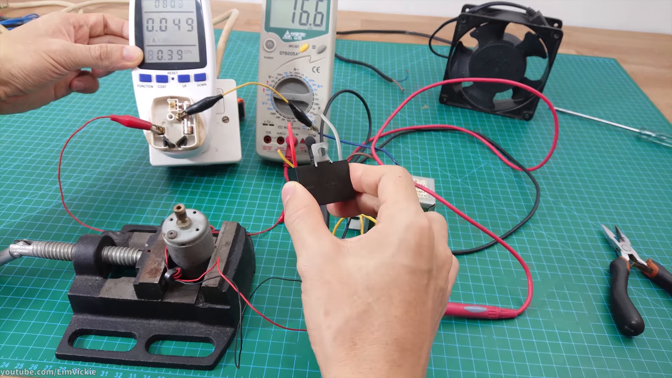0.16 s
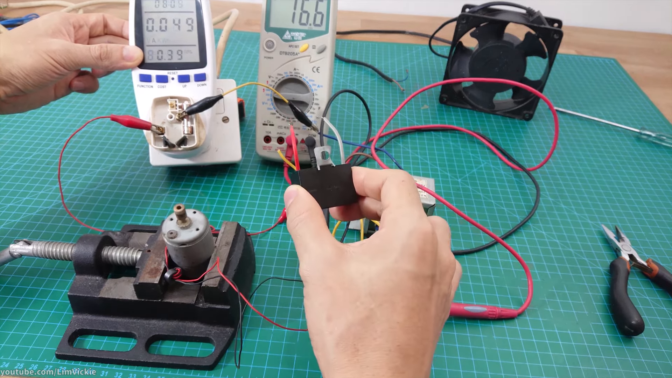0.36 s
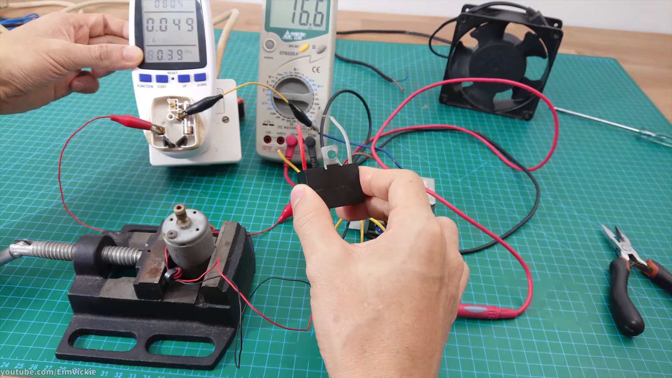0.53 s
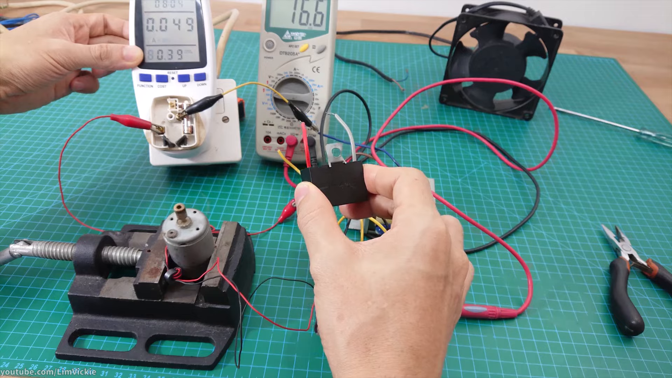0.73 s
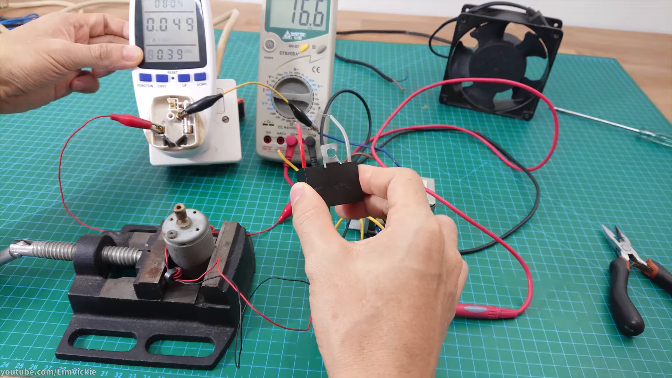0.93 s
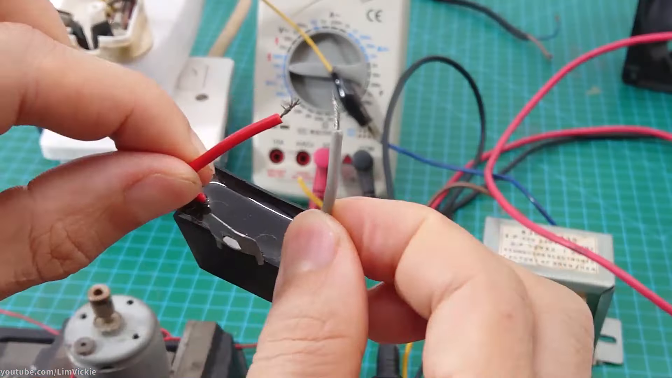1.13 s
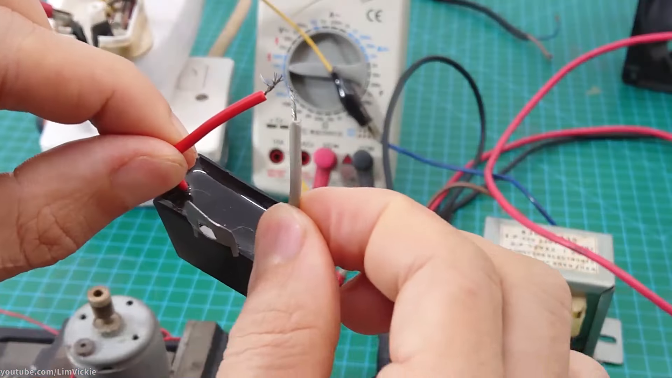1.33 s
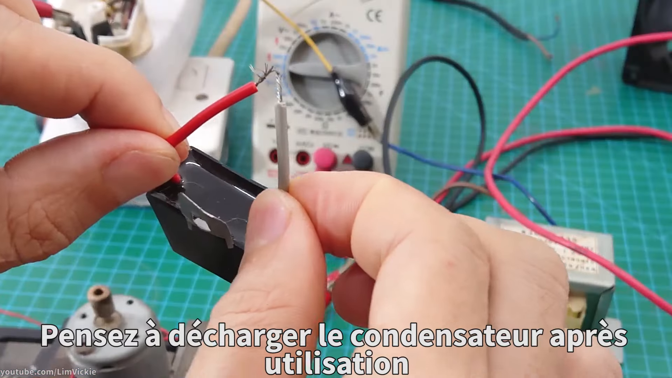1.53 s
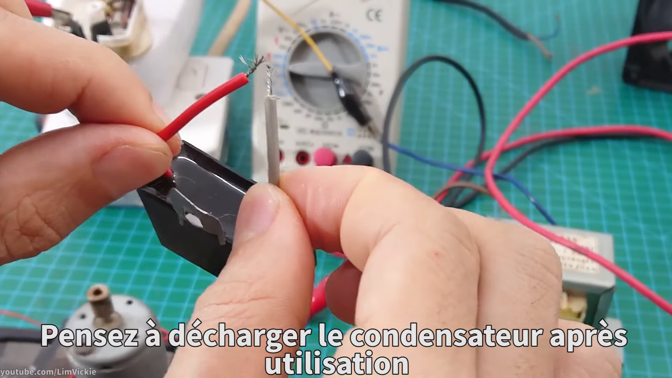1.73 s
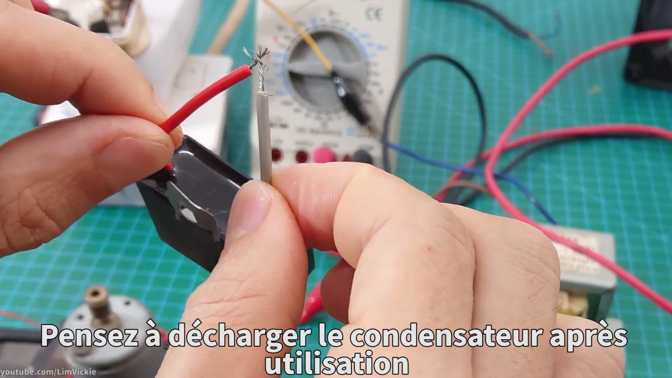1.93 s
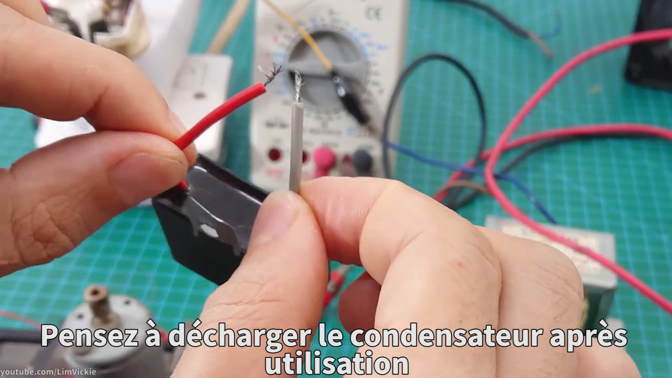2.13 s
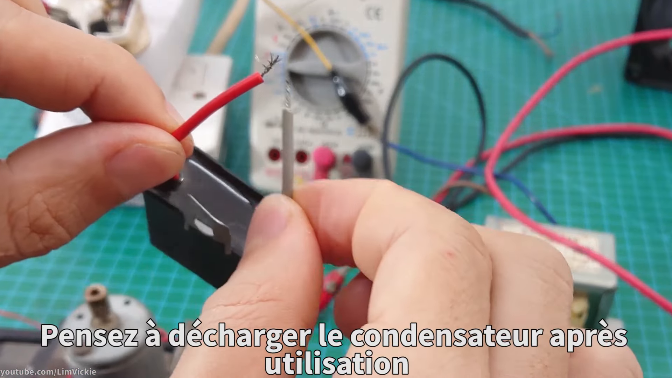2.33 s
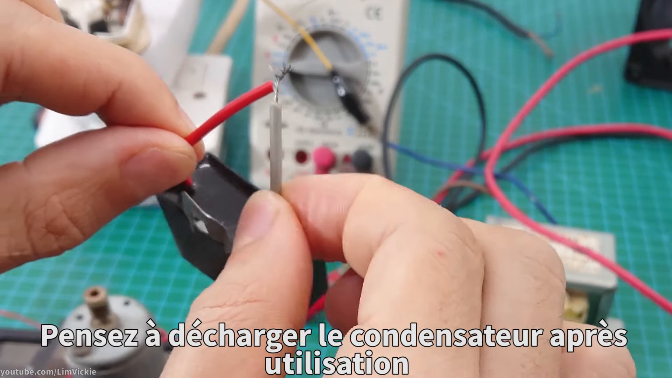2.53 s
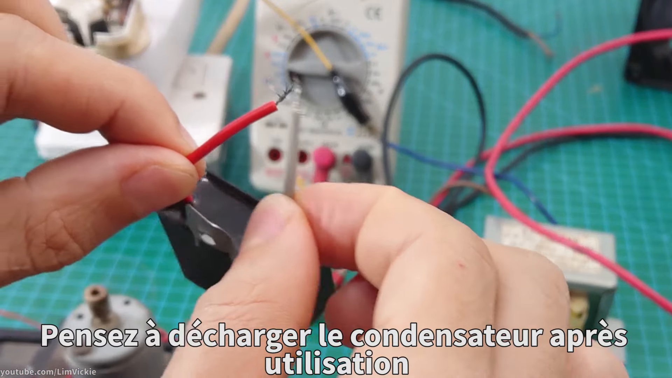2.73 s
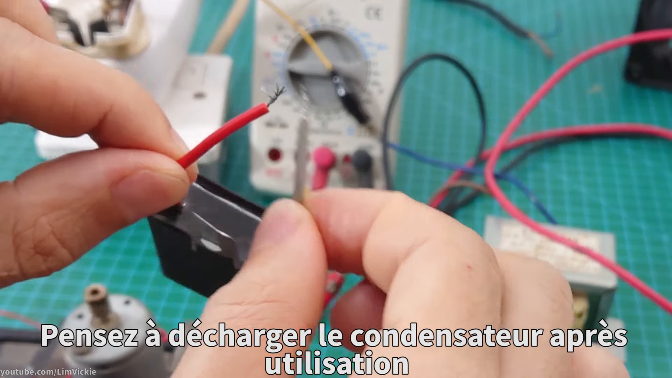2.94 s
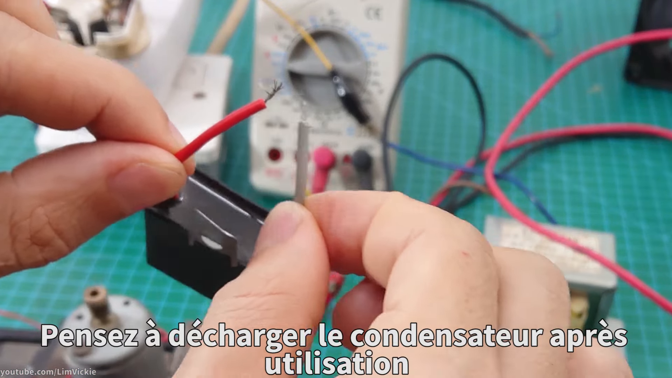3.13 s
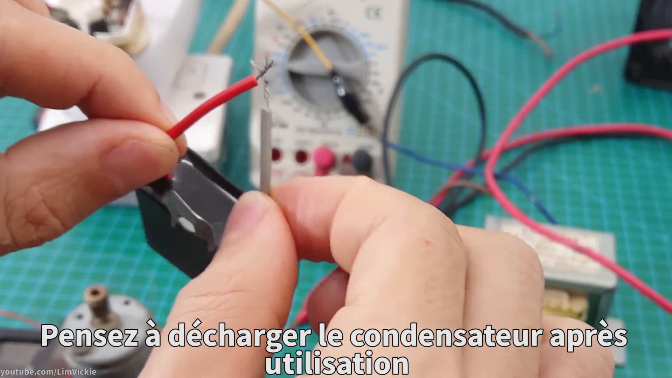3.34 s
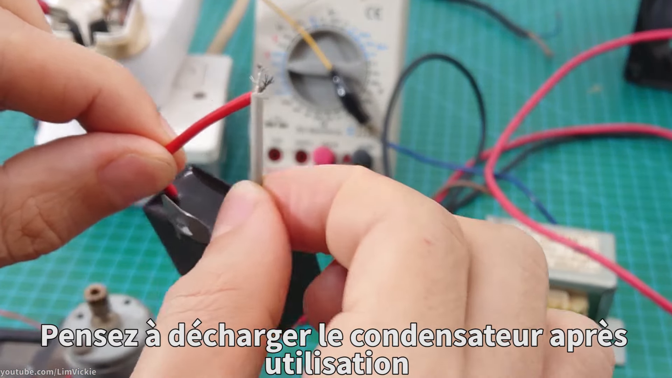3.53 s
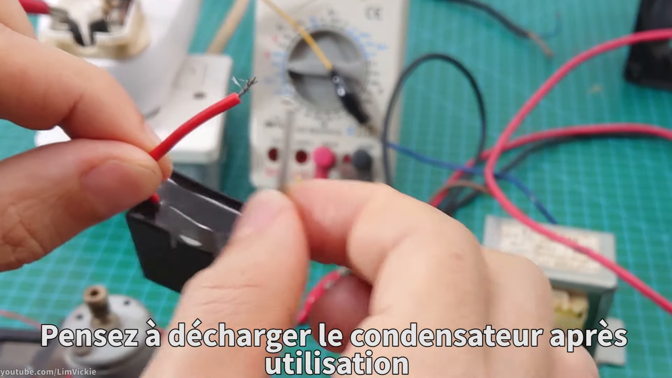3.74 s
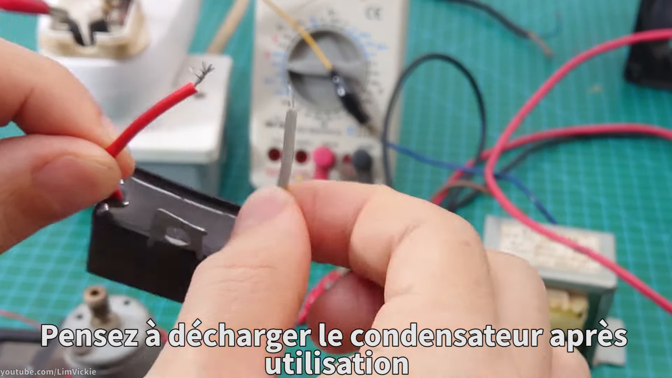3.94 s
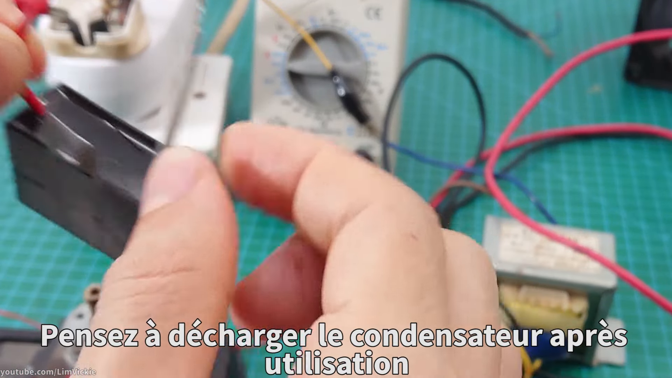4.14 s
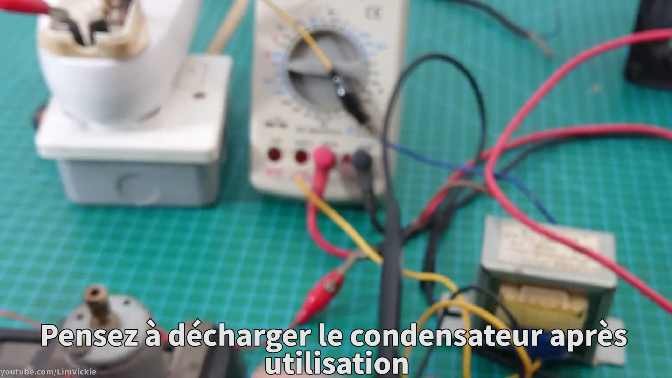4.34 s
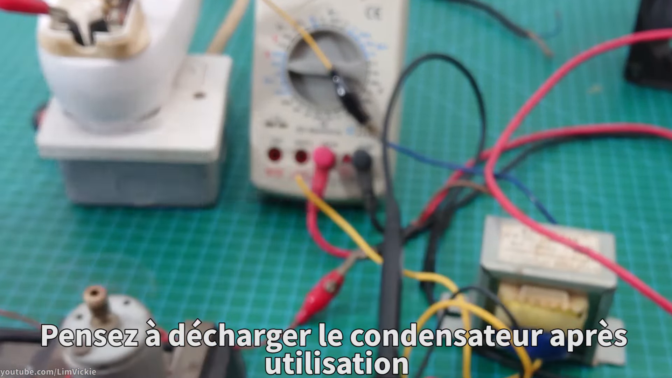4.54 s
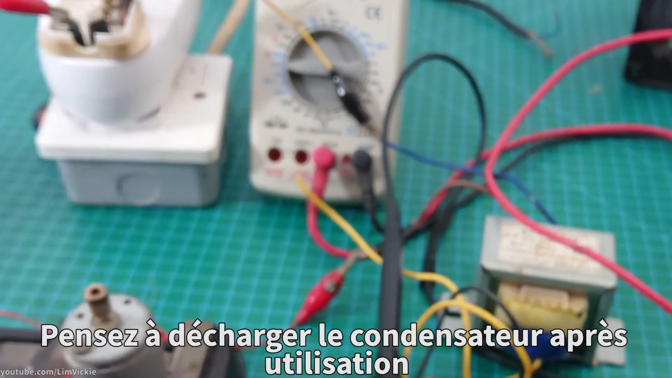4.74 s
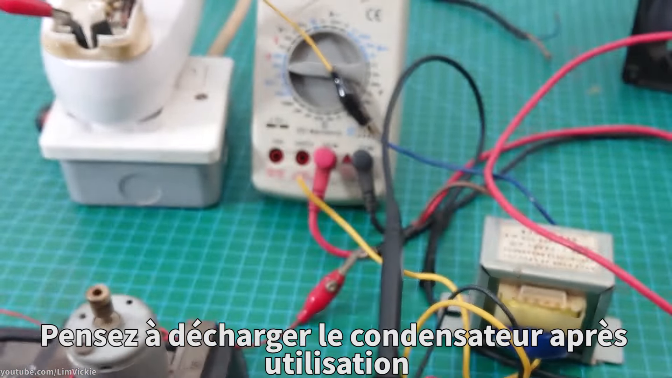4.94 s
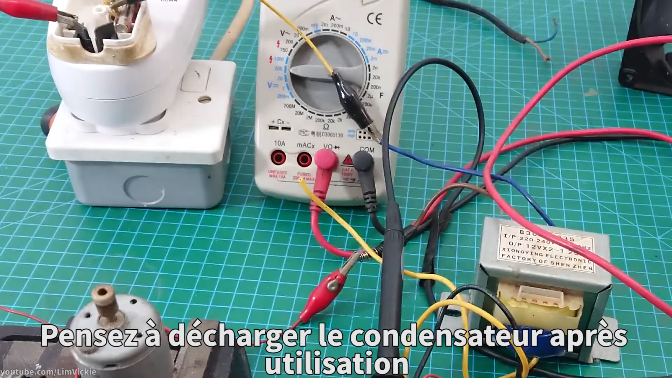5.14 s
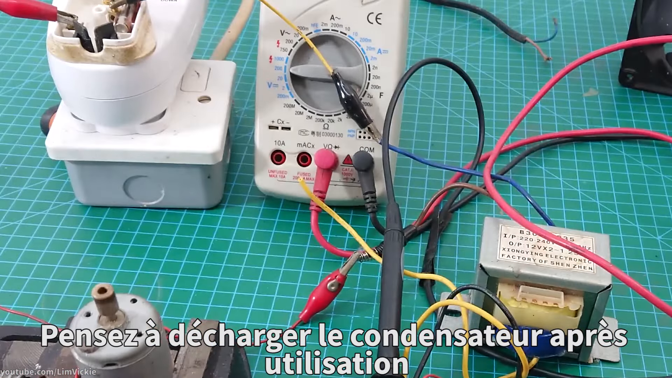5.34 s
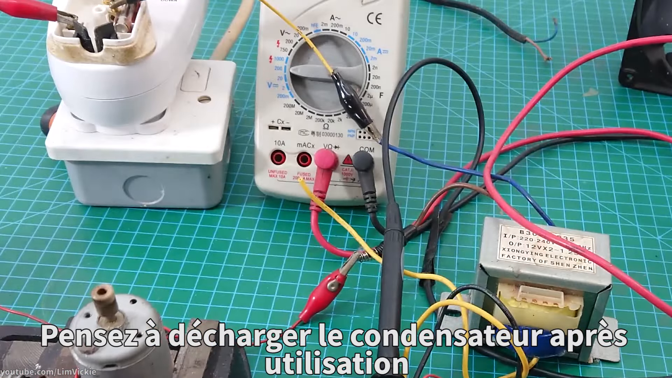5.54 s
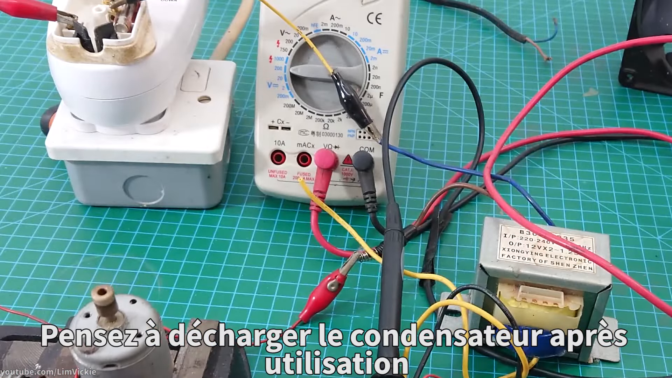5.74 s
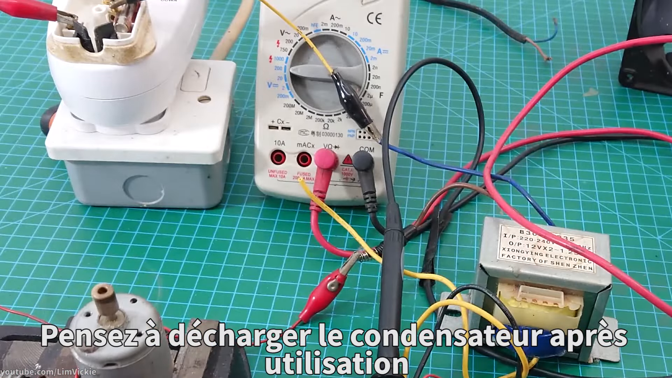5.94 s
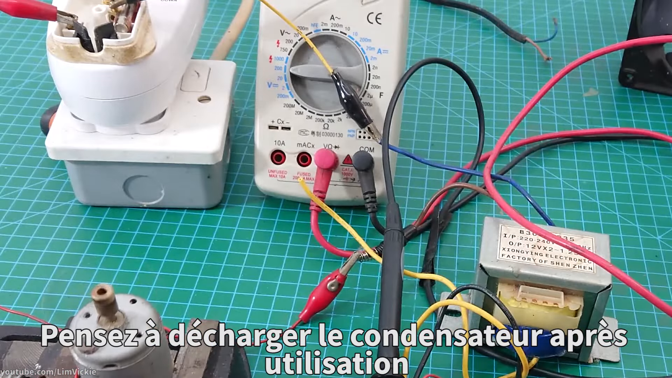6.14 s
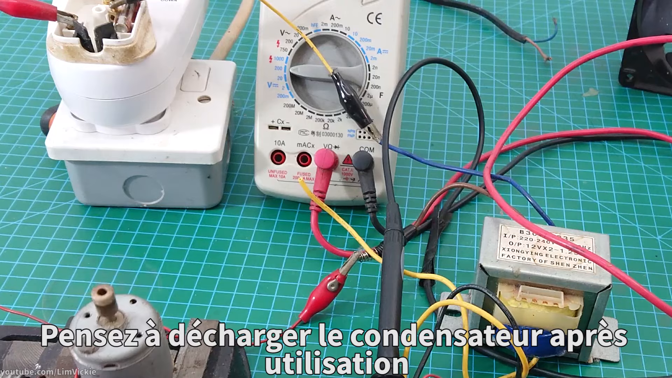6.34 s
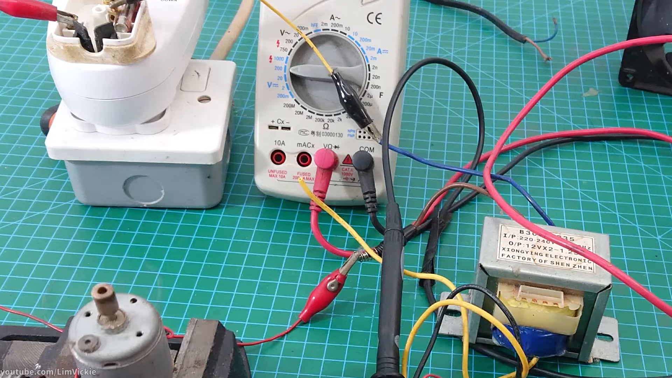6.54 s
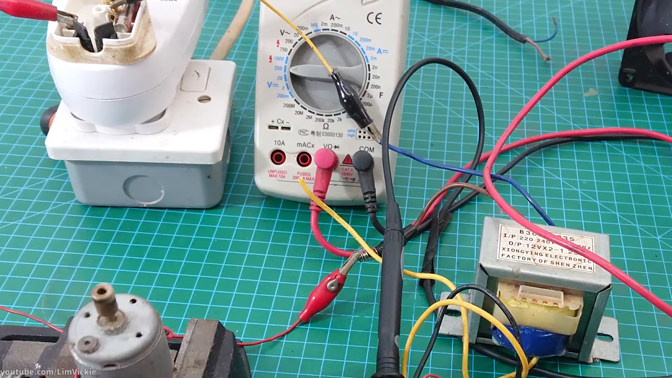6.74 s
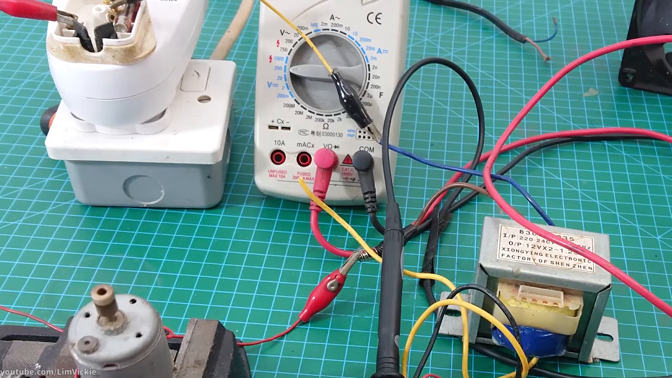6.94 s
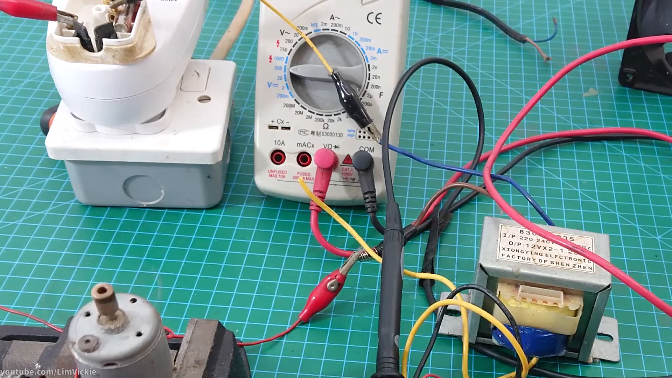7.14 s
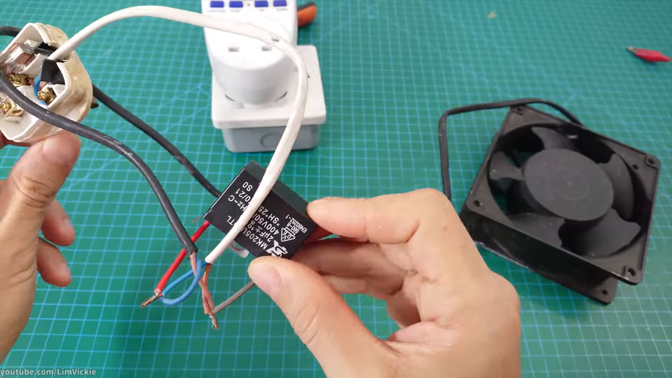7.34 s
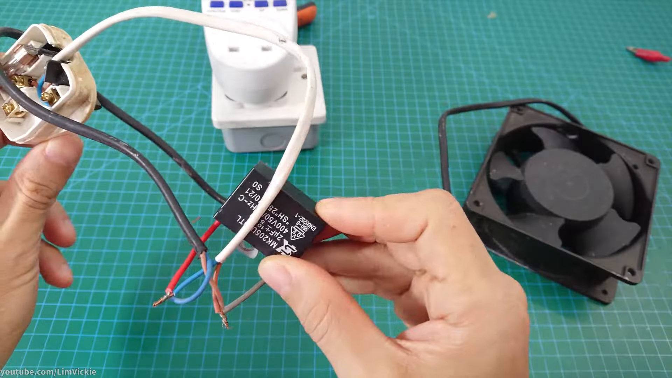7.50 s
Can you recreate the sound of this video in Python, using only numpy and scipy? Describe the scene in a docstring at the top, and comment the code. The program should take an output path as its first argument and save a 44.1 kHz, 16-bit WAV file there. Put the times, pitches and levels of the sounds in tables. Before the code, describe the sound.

At a workbench indoors, one loud spark cracks very close to the microphone as a capacitor's leads touch, with a short bright room tail and a faint click after it. Underneath, a small motor keeps up a faint hum and rattle, favouring the left side. A few light handling ticks and two faint high squeaks pass later, before the motor sound cuts off and only quiet room air remains.

```python
"""A workbench, stereo microphone, left port favoured. A small motor hums and rattles faintly, first from afar,
from 1.2 s close by. A charged capacitor is shorted by hand right at the microphone: a faint touch, one loud
spark at 2.06 s, another faint touch. The spark's pressure step sets the microphone's bass cut ringing and
makes the limiter duck the room for a moment. Handling ticks come at 5 s, then two thin squeaks and one
harder knock of the motor. At 7.27 s the sound drops out briefly and a quieter room follows."""
import sys
import numpy as np
from scipy import signal
from scipy.fft import rfft, irfft, next_fast_len
from scipy.io import wavfile
from scipy.ndimage import uniform_filter1d, minimum_filter1d

SR = 44100
rng = np.random.default_rng(int(sys.argv[2]) if len(sys.argv) > 2 else 0)


def persist_wave(psi):
    """Save psi, clipped to +-1, as 16-bit WAV."""
    counts = np.round(np.clip(psi, -1, 1) * 32767).astype(np.int16)
    wavfile.write(sys.argv[1], SR, np.atleast_2d(counts).T)


N = 333881
TIME = np.arange(N) / SR
CLOSE = TIME >= 1.205   # the microphone is close to the motor from here on


def from_db(db):
    """Decibels to gain."""
    return 10 ** (np.asarray(db) / 20)


def rms_one(x):
    """Scale to rms 1."""
    return x / np.sqrt(np.mean(x ** 2) + 1e-20)


def at_hz(points, hz):
    """Read a spectrum on a log-frequency axis."""
    f, value = np.transpose(points)
    return np.interp(np.log(np.maximum(hz, 1)), np.log(f), value)


def in_time(points):
    """Read a curve at every sample."""
    return np.interp(TIME, *np.transpose(points))


def dying(start, t60):
    """An envelope that jumps to 1 and dies away."""
    return (TIME >= start) * np.exp(-np.log(1000) * np.clip((TIME - start) / t60, 0, 10))


def resonate(x, hz, width_hz):
    """A resonance with gain 1 at its peak."""
    r = np.exp(-np.pi * width_hz / SR)
    poles = [1, -2 * r * np.cos(2 * np.pi * hz / SR), r * r]
    return signal.lfilter(np.array([1, 0, -1]) * (1 - r * r) / 2, poles, x + 1e-18)


def low_pass(x, hz, order):
    """Dull the treble above an edge."""
    return signal.lfilter(*signal.butter(order, hz, fs=SR), x)


def pan(lean_db):
    """Left and right gains of mean power 1."""
    ratio = from_db(np.atleast_1d(lean_db))
    return np.array([ratio, np.ones_like(ratio)]) * np.sqrt(2 / (1 + ratio ** 2))


# how much the microphone's left port is favoured: f/Hz, left minus right/dB
PORT_LEAN = [(60, 10.5), (200, 20), (400, 20), (700, 11.5), (1300, 11), (2400, 4), (4400, 3), (6000, 5.5),
             (8500, 12.5), (15000, 7)]

def noise(spectrum, lean=PORT_LEAN):
    """Stereo noise with a given level per Hz and lean to the left."""
    size = next_fast_len(N, real=True)
    hz = np.fft.rfftfreq(size, 1 / SR)
    gain = from_db(at_hz(spectrum, hz)) * pan(at_hz(lean, hz)) * np.sqrt(SR / 2)
    return irfft(rfft(rng.standard_normal((2, size))) * gain, size)[:, :N]


# room tone at the bench: f/Hz, level/dB per Hz
BENCH_AIR = [(20, -100), (40, -77.5), (70, -71.5), (110, -78.5), (250, -82), (420, -81.5), (700, -89.5),
             (1200, -88.5), (2100, -92), (3200, -96.5), (6000, -99.5), (8500, -102), (12500, -104),
             (15500, -104)]

def bench_air():
    """The air of the room, a steady low rush all round the microphone."""
    return noise(BENCH_AIR)


# hum at 2, 3, 4 ... times the turning rate: rms level/dB
HUM_LEVELS = [-57, -62, -54, -59, -64, -66.5, -60.5, -59, -75, -68, -69.5, -67.5, -69.5, -77, -71, -75,
              -76.5, -80, -73]
# thin steady whines: multiple of the turning rate (rounded when played), rms level/dB afar, close by
WHINE_LEVELS = [(24, -74, -66), (33, -64, -66.5), (35, -71, -74), (36, -67, -67.5), (39, -72, -71.5),
                (40, -68.5, -72.5), (48, -83, -76.5), (52, -70.5, -77), (58, -77, -67), (66.1, -66, -74.5),
                (68.1, -79, -80), (86.8, -74, -78), (92.2, -69, -75), (94, -81, -82), (98.1, -74, -84)]

def motor_hum(turns):
    """Harmonics of the turning rate; only the high whines change with the microphone's distance."""
    harmonics = list(enumerate(HUM_LEVELS, 2))
    for order, far_db, close_db in WHINE_LEVELS:
        harmonics.append((round(order), np.where(CLOSE, close_db, far_db)))
    angle = 2 * np.pi * (turns % 1)
    hum = np.zeros((2, N))
    for order, db in harmonics:
        tone = np.sqrt(2) * np.sin(order * angle + 2 * np.pi * rng.random())
        hum += from_db(db) * pan(at_hz(PORT_LEAN, order * TURNS_PER_S)) * tone
    return hum


# the bearing's rub at its loudest: f/Hz, level/dB per Hz
RUB_SPECTRUM = [(150, -110), (450, -100), (700, -92), (1200, -91.5), (1700, -94.5), (2150, -91.5),
                (3000, -95), (5000, -102.5), (7000, -110), (9000, -110), (15000, -115)]

def bearing_rub(turns, dip_db=5.5, softest_place=0.58):
    """The same roughness passes on every turn and rubs least at one place in it."""
    sample_in_turn = (turns % 1 * SR / TURNS_PER_S).astype(int)
    dip = np.cos(np.pi * (turns - softest_place)) ** 4
    return noise(RUB_SPECTRUM)[:, sample_in_turn] * from_db(-dip_db * dip)


def knocking(turns, place, hz, width_hz, uneven_db=1.0, jitter_turns=0.00017, skirt_hz=900):
    """A loose part is hit once a turn, never quite equally hard or on time, and rings; rms 1."""
    turn = np.arange(np.ceil(turns[0]), np.floor(turns[-1]))
    strength, late = rng.standard_normal((len(turn), 2)).T
    hits = np.searchsorted(turns, turn + place + jitter_turns * late)
    knocks = np.zeros(N)
    knocks[np.minimum(hits, N - 1)] = from_db(uneven_db * strength)
    ringing = resonate(knocks, hz, width_hz)
    ringing = resonate(ringing, hz, skirt_hz)   # the second pass darkens the skirts
    return rms_one(ringing) * pan(at_hz(PORT_LEAN, hz))


# the housing's ring from close by: t/s, rms level/dB
HOUSING_CLOSE = [(1.205, -58), (2.5, -57), (3.6, -56), (4.3, -56.5), (4.7, -60.5), (5.5, -58), (6.1, -55),
                 (7.27, -54.5)]

def housing_ring(turns, far_db=-63.5):
    """The motor's housing rings with the hardest knock of each turn."""
    level_db = np.where(CLOSE, in_time(HOUSING_CLOSE), far_db)
    return from_db(level_db) * knocking(turns, HARDEST_PLACE, hz=1108, width_hz=36, skirt_hz=600)


def in_room(x, wet_db, t60):
    """Add a diffuse tail, different at each port."""
    tail = rng.standard_normal((2, SR // 4)) * dying(.002, t60)[:SR // 4]
    tail /= np.sqrt(np.sum(tail ** 2, axis=1, keepdims=True))
    return x + from_db(wet_db) * signal.oaconvolve(x, tail, axes=1)[:, :N]


# loose parts: place in the turn/0-1, f/Hz, width/Hz, level/dB afar, level/dB close by before the hands
LOOSE_PARTS = [(.81, 1180, 30.3, -69, -61.5), (0.809, 1320, 640, -60.5, -63.5),
               (0.811, 2780, 380, -65.5, -63.5), (.82, 3690, 300, -68.5, -67), (.81, 5886, 172, -66, -65),
               (.124, 1412, 170, -64.5, -64), (0.126, 1609, 50, -67, -73), (0.125, 2770, 300, -71, -81),
               (.19, 6006, 168, -62, -67), (.197, 10110, 120, -73, -74.5), (0.196, 12300, 198, -77, -78),
               (.255, 3880, 385, -65, -64), (.255, 5925, 400, -60.5, -68.5), (.265, 8380, 600, -67, -73),
               (0.279, 11300, 600, -71.5, -78.5), (.278, 14300, 2300, -75, -80),
               (.29, 1155, 60, -68, -68.5), (0.389, 4650, 450, -72, -69.5), (.55, 9120, 400, -89, -78.5)]
# hands between motor and close microphone, screening less as they withdraw: t/s, loss/dB
HAND_SCREEN = [(4.1, 13), (4.4, 4.5), (5.4, -1), (5.9, -2)]

def rattles(turns, hands_edge_hz=5000):
    """Loose parts knock in every turn; close by, hands screen the treble of the hardest knock."""
    hands_db = in_time(HAND_SCREEN)
    rattle = np.zeros((2, N))
    for place, hz, width_hz, far_db, close_db in LOOSE_PARTS:
        with_hardest = np.cos(2 * np.pi * (place - HARDEST_PLACE)) > .5
        loss_db = hands_db if with_hardest and hz > hands_edge_hz else 0
        level_db = np.where(CLOSE, close_db - loss_db, far_db)
        rattle += from_db(level_db) * knocking(turns, place, hz, width_hz)
    return in_room(rattle, wet_db=-11, t60=0.048)


TURNS_PER_S, HARDEST_PLACE = 41.63, .81   # the hardest knock falls at this share of a turn
# the motor reaches the two ports out of step: f/Hz, lag of the right port/rad
RIGHT_LAG = [(100, -1.1), (700, -1.5), (1200, .5), (2500, 1.93), (3300, 2.9), (3700, 4), (5200, 6.5),
             (5800, 8), (7000, 9), (15000, 18)]

def motor(slowing_turns_per_s=0.13, slowest_s=3.55, slowing_width_s=0.38, jolt_s=6.579, jolt_db=3.5):
    """A small motor in the background turns steadily, slows very slightly once and knocks harder once."""
    slowing = np.exp(-.5 * ((TIME - slowest_s) / slowing_width_s) ** 2)
    turns = np.cumsum(TURNS_PER_S - slowing_turns_per_s * slowing) / SR
    turns += .22 * ~CLOSE   # the beat jumps where the close part begins
    jolt = from_db(jolt_db * dying(jolt_s, t60=0.073))
    left, right = motor_hum(turns) + bearing_rub(turns) + jolt * (housing_ring(turns) + rattles(turns))
    size = next_fast_len(N)
    lag = at_hz(RIGHT_LAG, np.fft.rfftfreq(size, 1 / SR))
    late_right = irfft(rfft(right, size) * np.exp(-1j * lag), size)[:N]
    return np.array([left, late_right])


def bass_cut(x, hz, q):
    """The microphone's second-order high-pass, which rings when q is high."""
    w = 2 * np.pi * hz / SR
    return signal.lfilter(*signal.bilinear([1, 0, 0], [1, w / q, w * w]), x)


# pressure steps at the left port as the leads touch:
# t/s, level/dB, polarity, treble edge f/Hz, time to leak away/s, opposite kick ahead/0-1
PRESSURE_STEPS = [(1.879, -35, -1, 400, .02, 0.2), (2.0647, 15, 1, 3860, .04, 0.34),
                  (2.6344, -17, -1, 2900, 0.0014, 0)]

def thumps(right_db=-40, kick_s=0.00014):
    """Each pressure step leaks away and comes through the bass cut as an edge and a short low swing."""
    pressure = np.zeros(N)
    for start, db, polarity, edge_hz, leak_s, kick in PRESSURE_STEPS:
        step = (TIME >= start) * np.exp(-np.minimum(np.abs(TIME - start) / leak_s, 20))
        step -= kick * ((TIME < start) & (TIME >= start - kick_s))
        pressure += polarity * from_db(db) * low_pass(step, edge_hz, order=2)
    ringing = bass_cut(pressure, hz=56, q=2.1)
    return bass_cut(ringing, hz=45, q=0.99) * from_db([[0], [right_db]])


# the crack, right at the microphone: f/Hz, width/Hz, left gain/dB, right gain/dB
CRACK_BANDS = [(6750, 830, 2, 20), (9900, 2500, 4, 13), (15100, 2000, 9, 11)]
# its echo from bench and walls: f/Hz, relative level/dB per Hz
ECHO_SPECTRUM = [(300, -22), (1200, -18), (2500, -13.5), (4500, -8.5), (7000, -8), (9500, -3.5),
                 (12000, -4), (15500, -1)]
# the room's tail leans left in the top treble: f/Hz, left minus right/dB
TAIL_LEAN = [(5000, 1.5), (10000, 6), (14000, 7)]

def spark(start=2.0645, wall_delay_s=0.005):
    """A very short crack, reflections off the bench and a wall, then the room's bright tail."""
    click = np.zeros(N)
    click[int(start * SR)] = 1
    crack = sum(from_db([[left_db], [right_db]]) * resonate(click, hz, width_hz)
                for hz, width_hz, left_db, right_db in CRACK_BANDS)
    bench = from_db(-3) * dying(start, t60=0.0074)
    wall = from_db(-12) * dying(start + wall_delay_s, t60=0.0091)
    room = from_db(-15) * dying(start, t60=0.3) + from_db(-43) * dying(start, t60=0.73)
    reflections = (bench + wall) * rms_one(noise(ECHO_SPECTRUM, lean=[(1, 2)]))   # 2 dB left throughout
    tail = room * rms_one(noise(ECHO_SPECTRUM, TAIL_LEAN))
    return crack + reflections + tail


# small contacts at the bench: t/s, level/dB before dulling, treble edge f/Hz
CONTACTS = [(4.989, -35, 1500), (4.992, -31, 700), (4.995, -34, 650), (5.111, -29, 9000),
            (5.115, -38, 1200), (5.125, -43, 6000)]
# what they ring with: f/Hz, relative level/dB per Hz
CONTACT_SPECTRUM = [(150, 2), (400, 2), (800, 2), (1150, 5), (1600, -6), (2200, 1), (2600, -1.5), (3020, 5),
                    (3500, -3.5), (4100, -4), (4800, -9), (5700, -4), (8000, -30), (15000, -32)]

def handling_ticks(t60=0.0078, room_db=-18, room_t60=0.15):
    """Short dry ticks with a little room behind them; each contact is dulled above its own treble edge."""
    body = rms_one(noise(CONTACT_SPECTRUM))
    ticks = np.zeros((2, N))
    for start, db, edge_hz in CONTACTS:
        envelope = dying(start, t60) + from_db(room_db) * dying(start, room_t60)
        ticks += from_db(db) * envelope * low_pass(body, edge_hz, order=1)
    return ticks


# thin high squeaks, left of centre: t/s, length/s, f/Hz before scoop and sag, sag/Hz per s, level/dB unfaded
SQUEAK_GLIDES = [(5.598, 0.2, 11900, 5000, -61), (5.738, 0.21, 13050, 9500, -65)]
# their partials: ratio to the pitch, relative level/dB
PARTIALS = [(.92, -7), (1, 0), (1.07, -6), (1.19, -12), (1.28, -14)]

def squeaks(scoop_hz=2600, scoop_s=0.03, waver_hz=80, rough_db=4,
            attack_s=0.056, fade_db_per_s=35, release_s=0.02):
    """A few thin wavering partials scoop up together, sag and fade."""
    waver = waver_hz * rms_one(uniform_filter1d(rng.standard_normal(N), size=300))
    rough = from_db(rough_db * rms_one(uniform_filter1d(rng.standard_normal(N), size=60)))
    out = np.zeros(N)
    for start, length, top_hz, sag_hz_per_s, db in SQUEAK_GLIDES:
        age = np.clip(TIME - start, 0, length)
        pitch_hz = top_hz - scoop_hz * np.exp(-age / scoop_s) - sag_hz_per_s * age + waver
        phase = 2 * np.pi * np.cumsum(pitch_hz) / SR
        tone = sum(from_db(partial_db) * np.sin(ratio * phase) for ratio, partial_db in PARTIALS)
        envelope = np.minimum(age / attack_s, 1) ** 2 * np.minimum((length - age) / release_s, 1)
        out += from_db(db - fade_db_per_s * age) * envelope * rms_one(tone * rough)
    return out * pan(lean_db=6)


# room tone of the quieter room: f/Hz, level/dB per Hz
QUIET_AIR = [(20, -96), (50, -62), (100, -84.5), (300, -80), (600, -85.5), (2000, -91.5), (3500, -102),
             (7000, -108.5), (15500, -110.5)]

def quieter_room():
    """Steady air with a low rumble and little treble."""
    return noise(QUIET_AIR)


def scene(dropout_s=7.27, quieter_room_s=7.341):
    """The bench, a short silence, the quieter room."""
    bench = bench_air() + motor() + thumps() + spark() + handling_ticks() + squeaks()
    return bench * (TIME < dropout_s) + quieter_room() * (TIME > quieter_room_s)


def limiter(x, ceiling_db=-1.0, hold_s=0.088, release_s=0.084, ahead_s=0.0093):
    """The gain dives just ahead of a peak, stays low for a moment and swells back."""
    ahead, hold = int(ahead_s * SR), int(hold_s * SR)
    needed = np.minimum(1, from_db(ceiling_db) / (np.abs(x).max(axis=0) + 1e-9))
    cut = 1 - minimum_filter1d(np.sqrt(needed), ahead + hold, origin=hold - (ahead + hold) // 2)
    decay = TIME / release_s
    released = np.exp(np.maximum.accumulate(np.log(cut + 1e-12) + decay) - decay)
    stage_gain = 1 - uniform_filter1d(released, ahead // 2)
    return x * stage_gain ** 2   # two equal stages: the release starts gently


def record(dry, notch_hz=7550, notch_width_hz=1300, notch_depth=0.62, cutoff_hz=15850):
    """The microphone's ports swallow a treble band, the limiter holds the peak, the top is cut."""
    coloured = dry - notch_depth * resonate(dry, notch_hz, notch_width_hz)
    top_cut = signal.ellip(10, .1, 80, cutoff_hz, fs=SR, output="sos")
    return signal.sosfilt(top_cut, limiter(coloured))


dry = scene()
out = record(dry)
persist_wave(out)
```